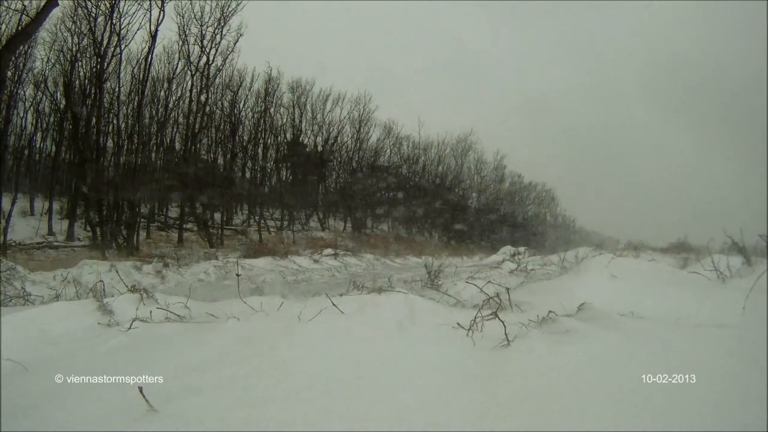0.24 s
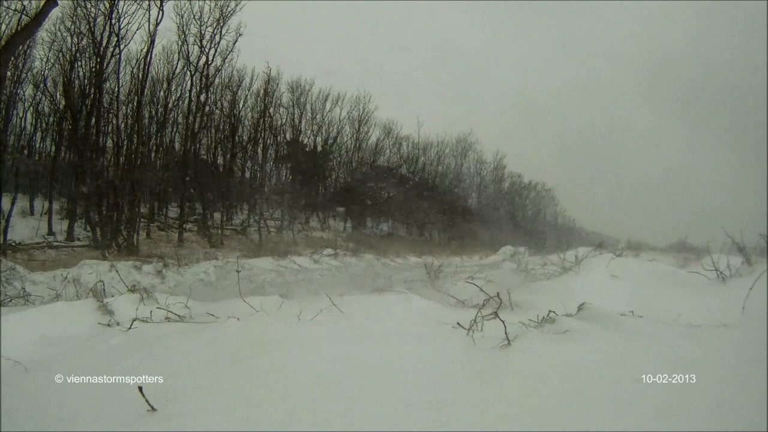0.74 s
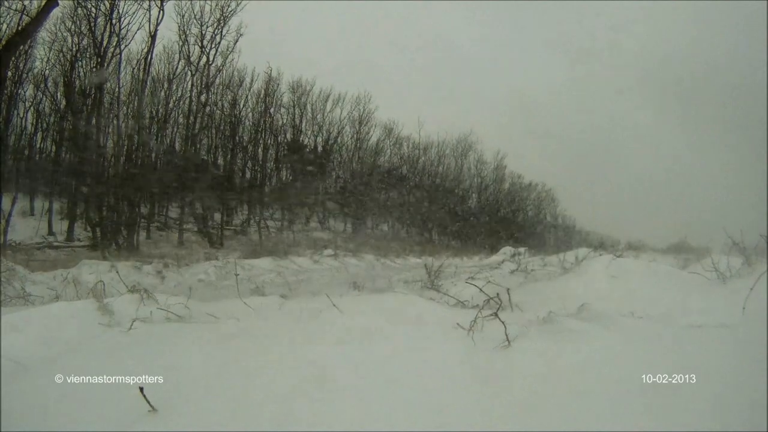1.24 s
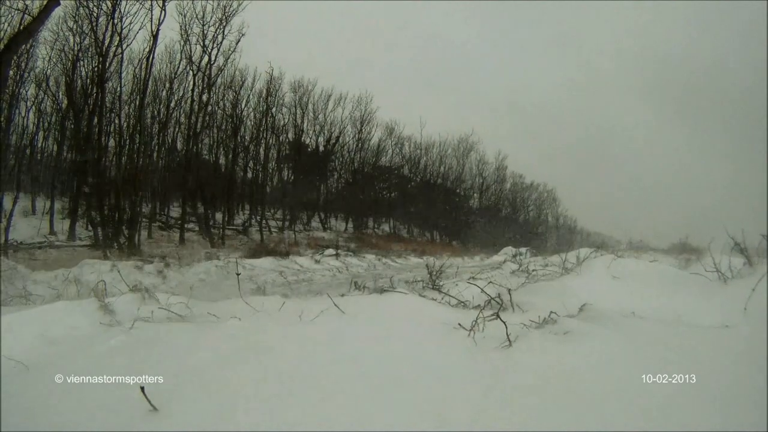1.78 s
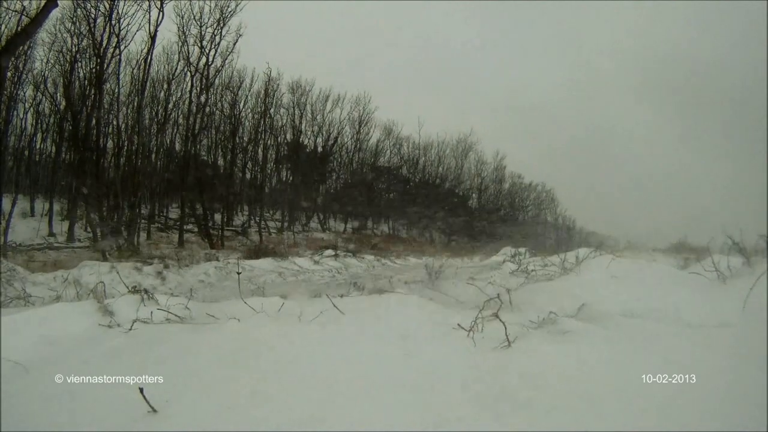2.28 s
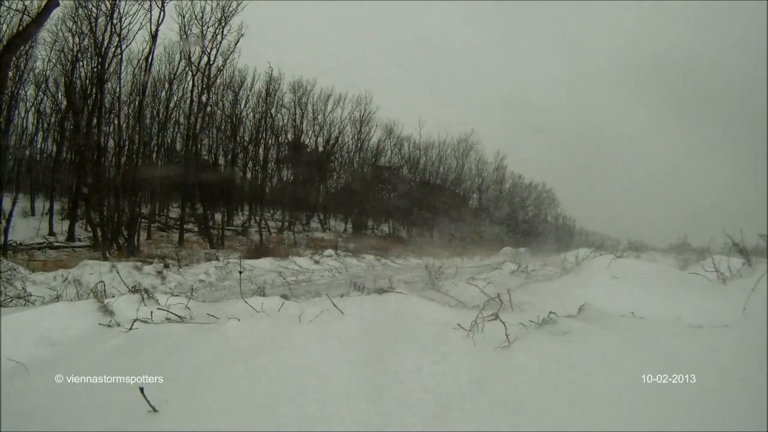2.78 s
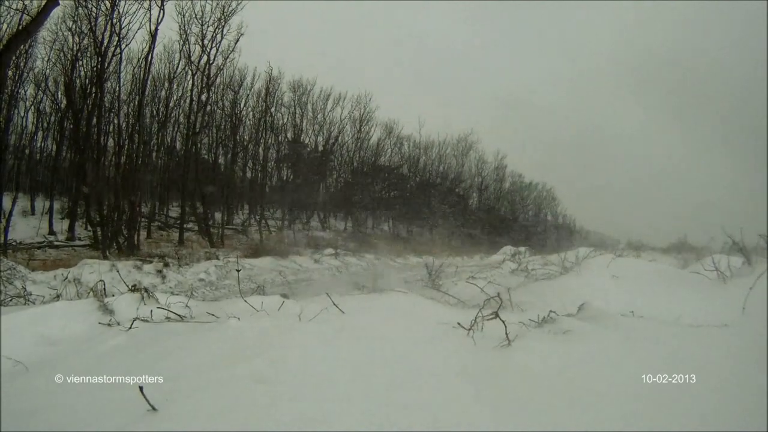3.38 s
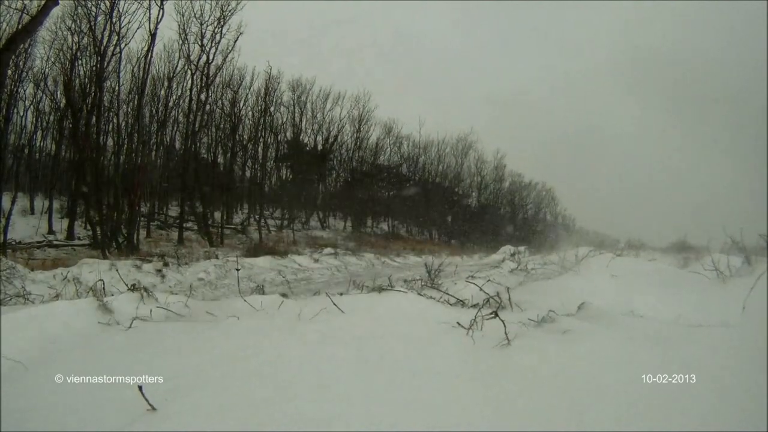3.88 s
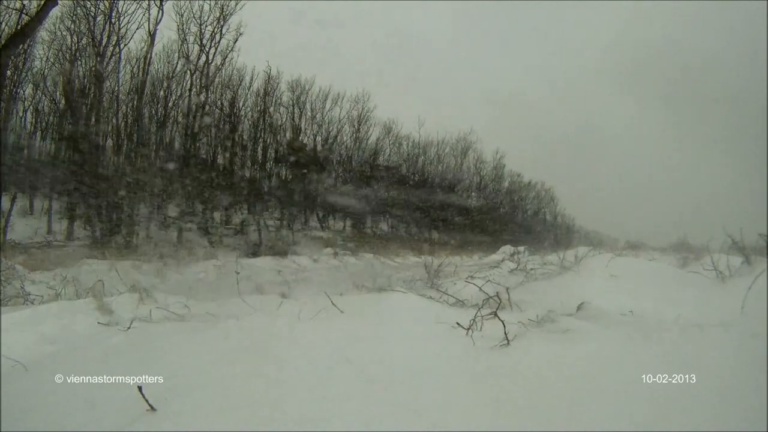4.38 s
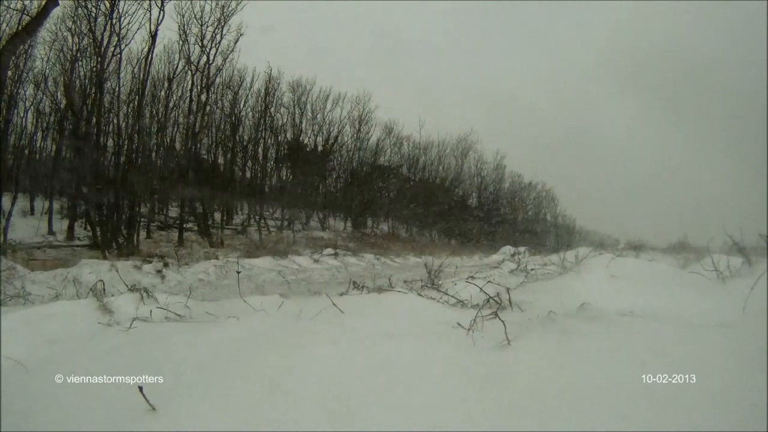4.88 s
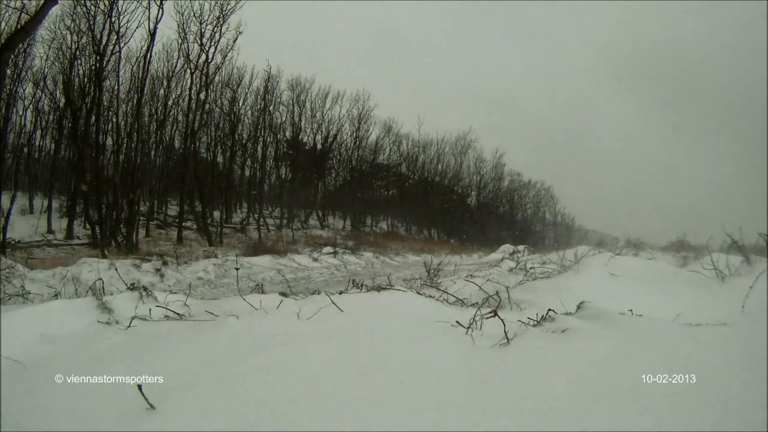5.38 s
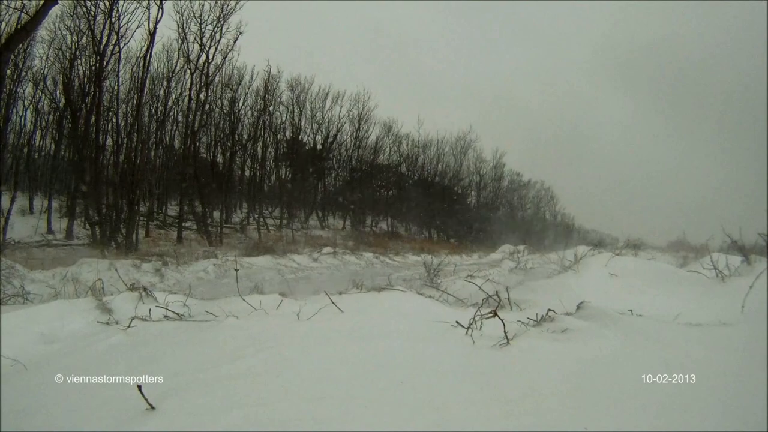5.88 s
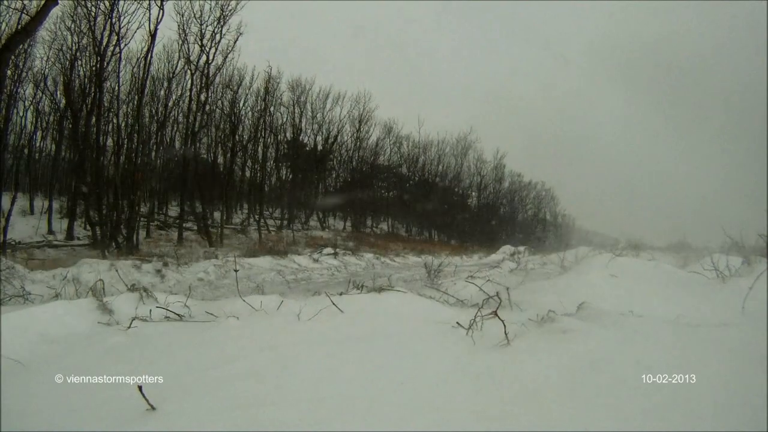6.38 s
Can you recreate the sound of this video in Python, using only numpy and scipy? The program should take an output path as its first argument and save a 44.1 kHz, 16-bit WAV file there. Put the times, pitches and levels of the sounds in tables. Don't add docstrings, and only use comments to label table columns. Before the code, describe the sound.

Blizzard wind strikes a small sealed plastic case over open snowy ground. A low rumble and hollow roar run throughout, while a whistly, fluttering rush surges and drops in quick gusts. Dull knocks come at the start and midway, puffs burst around two seconds, and snow pellets crackle thickest near three and a half. The microphone is inside the case: close, boxy, coarse and gritty, almost no space around it.

```python
import sys
import numpy as np
from scipy import signal
from scipy.fft import rfft, irfft
from scipy.io import wavfile
from scipy.ndimage import uniform_filter1d

SR = 44100
rng = np.random.default_rng(int(sys.argv[2]) if len(sys.argv) > 2 else 0)


def nominal_scale(level):
    x = np.asarray(level, float) / 20
    return 10 ** x


def dump_mix(stems):
    frames = np.atleast_2d(stems).T
    limited = np.clip(frames, -1, 1)
    pcm = np.round(limited * 32767).astype(np.int16)
    wavfile.write(sys.argv[1], SR, pcm)


N = 292824


def evened(x):
    return x / np.sqrt(np.mean(x ** 2) + 1e-20)


def coloured(points):
    f, db = np.transpose(points)
    hz = np.fft.rfftfreq(N, 1 / SR)
    density_db = np.interp(np.log(hz + 1), np.log(f + 1), db)
    return evened(irfft(rfft(rng.standard_normal(N)) * nominal_scale(density_db), N))


def flutter(low_hz, high_hz):
    hz = np.fft.rfftfreq(N, 1 / SR) + 1e-3
    shape = 1 / np.sqrt(hz) / (1 + (low_hz / hz) ** 2) / (1 + (hz / high_hz) ** 2)
    return evened(irfft(rfft(rng.standard_normal(N)) * shape, N))


def ring(x, hz, width_hz):
    r, turn = np.exp(-np.pi * width_hz / SR), np.cos(2 * np.pi * hz / SR)
    return signal.lfilter([1, -r * turn], [1, -2 * r * turn, r * r], x)


def hum(hz, width_hz, db):
    noise = rng.standard_normal(N)
    return nominal_scale(db) * evened(ring(ring(noise, hz, width_hz), hz, width_hz))


def add(mix, s, sound):
    part = mix[max(round(s * SR), 0):][:len(sound)]
    part += sound[:len(part)]


def curves(rows):
    s, *columns = np.transpose(rows)
    return [np.interp(np.arange(N) / SR, s, c) for c in columns]


def swells(rows):
    rise_share = 0.64
    t, out = np.arange(N) / SR, np.zeros((2, N))
    for s, first_db, fall_s, second_db in rows:
        near = slice(max(round((s - .5) * SR), 0), round((s + .5) * SR))
        u = (t[near] - s) / max(fall_s, .01)
        bell = np.exp(-np.where(u < 0, u / rise_share, u) ** 2)
        out[:, near] += np.outer([first_db, second_db], bell)
    return out


# start_s [s], wind_db [dB], rush_sharpness_db [dB], buffeting_db [dB]
STORM_WIND = [(0.0, -29.5, 0.4, -29), (0.31, -28, 2.2, -32.5), (0.72, -28.5, -0.9, -34.5),
              (0.84, -40, -2.8, -33), (1.12, -27.5, 2, -35), (1.6, -30.5, -1.9, -33.5),
              (2.14, -28.5, -1, -31.5), (2.28, -39, 4.2, -32.5), (2.76, -27.5, -2.7, -33.5),
              (3.04, -31.5, 1.6, -35.5), (3.76, -37.9, 0.1, -33), (3.89, -28.5, 1.5, -34.5),
              (4.4, -44, -2.8, -40.5), (4.48, -29.5, 4.5, -35), (5.15, -29.5, 0.5, -32.5),
              (5.45, -44.5, -2.6, -41.5), (6.12, -44, -0.2, -38.5), (6.64, -34.0, -0.8, -34)]
# top_s [s], lift_db [dB], fall_s [s], sharpness_db [dB]
WIND_GUSTS = [(0.143, 2.5, 0.13, -3), (0.254, -7, 0.083, -2), (0.46, -1.5, 0.052, 1),
              (0.628, -3, 0.023, -6), (0.894, 5, 0.022, 4.2), (0.988, 1.6, 0.034, 7), (1.14, 0.1, 0.03, 0),
              (1.234, 0.8, 0.04, -4.5), (1.516, 6.1, 0.066, 0.5), (2.008, -4, 0.022, 4),
              (2.209, 0.7, 0.11, -7), (2.429, 7.4, 0.051, -4.5), (2.595, 11, 0.052, -1.7),
              (2.7, -0.5, 0.025, -1.5), (2.94, 4.5, 0.098, -2.1), (2.999, -7, 0.038, -1),
              (3.12, 1.5, 0.024, 0.5), (3.341, 3, 0.058, -4.5), (3.475, 5, 0.097, 1),
              (3.67, -0.5, 0.09, -1.5), (4.07, 0.5, 0.046, -2.5), (4.15, -2.5, 0.047, 3.5),
              (4.29, 2.5, 0.078, 2), (4.725, -4, 0.16, -2.1), (4.97, 2, 0.054, -1.3), (5.217, -4, 0.02, 4),
              (5.29, 4, 0.022, -1), (5.956, -3.5, 0.19, 1.2), (6.16, 0, 0.045, 3), (6.276, 5, 0.097, -0.5)]
# top_s [s], roar_lift_db [dB], fall_s [s], rumble_lift_db [dB]
CASE_HEAVES = [(0.46, 0.7, 0.07, 2), (0.78, 5.5, 0.1, 0.5), (0.96, -2.5, 0.05, -1), (1.05, 3, 0.074, 3.5),
               (1.4, 1.5, 0.1, 2), (1.72, -3.5, 0.11, -3), (1.93, 3, 0.041, 0), (2.66, 5.5, 0.054, 1.5),
               (2.76, 0.2, 0.037, -1), (3.0, 3.5, 0.065, 3), (3.6, 2, 0.066, -4), (3.78, -1, 0.07, 0.5),
               (4.1, 3.5, 0.077, -3.5), (4.33, 2, 0.04, 2.2), (4.75, 2, 0.083, 1), (4.98, -2, 0.087, 1),
               (5.28, 0, 0.073, 1.5), (5.67, 4, 0.08, 1.5), (5.85, -1, 0.046, 2), (6.0, 1, 0.07, 0.2),
               (6.16, -3.5, 0.05, -1.2), (6.29, 3, 0.097, 2.5), (6.6, -3, 0.07, -2)]


def storm():
    lower_db, upper_db, fizz_db, roar_offset_db = -3, -0.12, -8, -5
    fizz_per_gust, roar_per_gust, roar_per_wind = 1.63, 0.35, 0.16
    calm_db = -30
    wind_db, sharp_db, buffet_db = curves(STORM_WIND)
    gust_db, tilt_db = swells(WIND_GUSTS)
    roar_db, rumble_db = swells(CASE_HEAVES)
    sharp_db = sharp_db + tilt_db
    roar_db = roar_db + roar_offset_db + roar_per_wind * (wind_db - calm_db) + roar_per_gust * gust_db
    return dict(rumble=buffet_db + rumble_db, roar=buffet_db + roar_db,
                lower=wind_db + gust_db - sharp_db + lower_db, upper=wind_db + gust_db + upper_db,
                fizz=wind_db + fizz_per_gust * gust_db + sharp_db + fizz_db)


# start_s [s], peak_db [dB], pitch_hz [Hz], t60_s [s]
MOUNT_KNOCKS = [
    (0.001, -18.5, 253, 0.034),
    (0.209, -26.5, 248, 0.045),
    (0.517, -22, 250, 0.039),
    (0.582, -28, 249, 0.042),
    (2.404, -20, 255, 0.035),
    (3.682, -27.5, 260, 0.042),
]
# start_s [s], peak_db [dB], pitch_hz [Hz], t60_s [s]
HIGH_RAP = (3.667, -27, 850, .02)
# start_s [s], peak_db [dB], pitch_hz [Hz], t60_s [s]
FAR_PINGS = [
    (5.3667, -42, 5380, 0.02),
    (5.5338, -35, 5230, 0.015),
    (5.618, -43, 5250, 0.02),
    (5.7119, -40, 5290, 0.02),
    (5.7912, -44, 5130, 0.02),
    (5.8506, -32, 5190, 0.016),
]


def knocks():
    out, t = np.zeros(N), np.arange(0, .15, 1 / SR)
    for s, db, hz, t60_s in list(MOUNT_KNOCKS) + [HIGH_RAP] + list(FAR_PINGS):
        decay = nominal_scale(db + 10.5 - 60 * t / t60_s)
        onset = 1 - np.exp(-t / (0.12 * t60_s))
        add(out, s, decay * onset * np.sin(2 * np.pi * hz * t))
    return out


# start_s [s], level_db [dB], share of the two lower modes [dB]
SNOW_PELLETS = [(0.3451, 3.5, -4), (1.1513, -11, -15), (2.4117, -6, -7.5), (2.432, -16, -9),
                (2.5905, -4.5, -13), (2.6332, -10, -5), (2.6383, -12.5, -6), (2.71, -2, -4.5),
                (3.0899, -15, -8), (3.2124, -9.5, -6), (3.2404, -9.5, -2.5), (3.355, -14.5, -4),
                (3.4344, -2, -9), (3.4388, -6, -5), (3.4455, -4, -6), (3.4632, -13, 0), (3.4671, -10, -7),
                (3.482, -10, -4), (3.4981, -7, -8), (3.5038, -9, -13), (3.541, -11.5, -5),
                (3.5643, -7, -5.5), (3.7727, -5.5, -4), (4.456, -10, -5.5), (5.0425, -14, -7),
                (5.045, -13.5, -12), (6.2894, -13.5, -10), (6.296, -16, -5), (6.3234, -8.5, -9),
                (6.3298, -12, -1.5)]
# start_s [s], level_db [dB]
LONE_FLAKES = [(0.0217, -26), (0.2966, -28), (0.9802, -20), (1.0042, -27), (1.1333, -20), (1.4161, -16),
               (2.4072, -18), (2.4166, -21), (2.4681, -16), (2.5794, -18), (2.612, -17), (2.7418, -16.5),
               (3.053, -21), (3.161, -21), (3.247, -19), (3.2737, -19), (3.2765, -16), (3.3438, -20),
               (3.3747, -25), (3.582, -21), (4.562, -17), (4.58, -18), (5.0479, -17), (5.0712, -17.5),
               (5.1482, -18.5), (5.2367, -23), (6.0343, -42), (6.285, -16), (6.3897, -28), (6.4299, -24.5)]
# start_s [s], length_s [s], level_db [dB]
SNOW_FLURRIES = [
    (1.1, .06, -26),
    (2.4, .05, -25.5),
    (3.026, .09, -28.5),
    (3.33, .04, -20.5),
    (3.534, .013, -19),
    (4.56, .03, -26),
    (5.04, .02, -23),
    (5.36, .2, -48.5),
    (5.7, .12, -47),
    (6.025, .2, -52),
]
# pitch_hz [Hz], width_hz [Hz], level_db [dB]
TICK_MODES = [(2170, 260, -5), (3650, 430, 4.5), (5144, 353, 4)]


def snow(fizz_db):
    flake_share_db = -4
    fine_per_s, fine_db, fine_spread_db = 70, 2, 2.5
    flurry_per_s = 70
    choke_s = 0.0012
    flakes = [(*row, flake_share_db) for row in LONE_FLAKES]
    s, db, share_db = np.transpose(list(SNOW_PELLETS) + flakes)
    spread_db = fine_spread_db * np.minimum(rng.exponential(1, N), 3)
    luck = rng.random((2, N))
    fine = nominal_scale(fizz_db + fine_db + spread_db) * (luck[0] < fine_per_s / SR)
    for start_s, length_s, flurry_db in SNOW_FLURRIES:
        span = slice(round(start_s * SR), round((start_s + length_s) * SR))
        fine[span] += nominal_scale(flurry_db + spread_db[span]) * (luck[1, span] < flurry_per_s / SR)
    t, out = np.arange(100) / SR, 0
    choke = 1 / (1 + np.exp((t - choke_s) / .00008))
    strike = np.round((s - .0004) * SR).astype(int)
    for (hz, width_hz, mode_db), mode_share_db, sign in zip(TICK_MODES, (share_db, share_db, 0 * db), (1, -1, 1)):
        clicks = fine.copy()
        clicks[strike] += nominal_scale(0.99 * db + mode_share_db)
        tick = nominal_scale(mode_db) * np.exp(-np.pi * width_hz * t) * np.cos(2 * np.pi * hz * t) * choke
        out = out + sign * signal.oaconvolve(clicks, tick)[:N]
    return out


# pitch_hz [Hz], density_db [dB per Hz]
RUMBLE_SPECTRUM = [(11, -35), (18, -4), (38, 2), (54, 2), (102, -7), (140, -4.5), (153, -10), (184, -19),
                   (210, -19.5), (259, -14), (340, -20), (440, -51), (750, -120)]
# pitch_hz [Hz], density_db [dB per Hz]
ROAR_SPECTRUM = [(190, -37), (330, -17.5), (361, -9.5), (398, -2), (456, 0.5), (745, -8), (895, -4.5),
                 (1040, -10), (1150, -5.5), (1500, -18), (2530, -120)]
# pitch_hz [Hz], width_hz [Hz], level_db against the rumble [dB]
MOUNT_MODES = [
    (50, 38, -8.5),
    (139, 15.6, -11),
]
# pitch_hz [Hz], width_hz [Hz], level_db against the roar [dB]
CASE_AIR = (459, 66, -12.5)


def shake(rumble_db, roar_db):
    rumble = coloured(RUMBLE_SPECTRUM) + sum(hum(*mode) for mode in MOUNT_MODES)
    rumble /= (uniform_filter1d(rumble ** 2, size=2600) + .1) ** 0.16
    roar = coloured(ROAR_SPECTRUM) + hum(*CASE_AIR)
    roar = roar * nominal_scale(1.2 * flutter(low_hz=6.2, high_hz=40))
    return nominal_scale(rumble_db + 0.4) * evened(rumble) + nominal_scale(roar_db + 0.8) * evened(roar)


# start_s [s], peak_db [dB], pitch_hz [Hz], length_s [s]
AIR_PUFFS = [(0.1695, -15, 2150, 0.013), (0.181, -15, 1450, 0.013), (0.737, -30, 2080, 0.012),
             (0.9016, -7.5, 1520, 0.0077), (1.407, -19, 1930, 0.011), (1.518, -12, 1480, 0.014),
             (1.586, -14, 1480, 0.014), (1.9784, -9, 1570, 0.011), (2.0443, -14, 1520, 0.015),
             (2.0767, -2.5, 1490, 0.012), (2.1206, -12, 1710, 0.012), (2.1444, -10, 1500, 0.012),
             (2.1909, -11, 1490, 0.011), (2.237, -19, 1490, 0.015), (2.2455, -14.5, 1320, 0.025),
             (2.4104, -14, 2080, 0.012), (2.607, -2.5, 2090, 0.01), (2.6284, -6.5, 1424, 0.028),
             (2.6756, -8, 1460, 0.011), (2.7506, -5.5, 1470, 0.009), (3.31, -19, 2030, 0.012),
             (3.671, -17.5, 1930, 0.013), (4.504, -14.5, 2160, 0.01), (5.1277, -13, 1470, 0.01),
             (5.297, -20, 1480, 0.012), (5.53, -21.5, 2170, 0.011), (5.908, -24.5, 1490, 0.012),
             (6.031, -21.5, 1970, 0.015), (6.19, -23, 2210, 0.0092), (6.525, -14.5, 2010, 0.011)]


def puffs():
    out = np.zeros(N)
    for (s, db, hz, length_s), (phase, drift) in zip(AIR_PUFFS, rng.random((len(AIR_PUFFS), 2))):
        t = np.arange(0, max(length_s, .004), 1 / SR)
        u = t / t[-1]
        cycles = phase + hz * t * (1 + 0.048 * (drift - .5) * u)
        swell = np.sin(np.pi * u ** 0.34) ** 2
        add(out, s - .0008, nominal_scale(db - 7.5) * np.sin(2 * np.pi * cycles) * swell)
    return out


# pitch_hz [Hz], width_hz [Hz], level_db [dB]
LOWER_MODES = [(1302, 290, -8), (1457, 142, 1), (1605, 150, -5.5)]
# pitch_hz [Hz], width_hz [Hz], level_db [dB]
UPPER_MODES = [(1910, 270, -2), (2099, 184, -0.5), (2323, 306, -7)]
# pitch_hz [Hz], width_hz [Hz], level_db [dB]
FIZZ_MODES = [(2770, 590, -10.5), (3502, 360, -3.5), (4370, 630, -7), (5104, 390, -6.5)]


def rush(*levels_db):
    shared, out = flutter(low_hz=6.1, high_hz=96), 0
    for level_db, modes, shared_db in zip(levels_db, (LOWER_MODES, UPPER_MODES, FIZZ_MODES), (1.8, 1.7, 2.4)):
        layer = 0
        for hz, width_hz, db in modes:
            own = flutter(low_hz=2.3, high_hz=60)
            eddies = rng.standard_normal(N) * nominal_scale(shared_db * shared + 1.07 * own)
            rung = ring(ring(eddies, hz, 1.64 * width_hz), hz, 1.77 * width_hz)
            layer = layer + nominal_scale(db) * evened(rung)
        out = out + nominal_scale(level_db + 1.21) * evened(layer)
    return out


def scene():
    level = storm()
    air = shake(level["rumble"], level["roar"]) + rush(level["lower"], level["upper"], level["fizz"])
    return np.tile(air + puffs() + snow(level["fizz"]) + knocks(), (2, 1))


def sample_and_hold(x):
    edge_hz, ceiling = 6440, 1.1
    smooth = signal.oaconvolve(x, signal.firwin(75, edge_hz, window=("kaiser", 4), fs=SR), "same")
    slow = signal.resample_poly(smooth, 40, 147, window=("kaiser", 2))
    full = np.clip(slow, -ceiling, ceiling)
    return signal.resample_poly(np.repeat(full, 4), 147, 160)[:N]


# start_s [s], level_db [dB]
CHANNEL_SLIPS = [
    (2.483, -14),
    (2.61, -18),
    (3.115, -16),
    (3.5393, -14),
    (4.5628, -15),
    (5.0564, -24),
]


def slips(both):
    for s, db in CHANNEL_SLIPS:
        add(both[0], s, -nominal_scale(db) * np.ones(8))


def band(x, low_hz, high_hz):
    taps = signal.firwin(401, [low_hz, high_hz], window=("kaiser", 8), pass_zero=False, fs=SR)
    return signal.oaconvolve(x, taps[None], "same")


def thin_treble(both, level):
    top_hz, gap_db = 15300, -38
    kept = both - band(both, top_hz, .49 * SR)
    edge = band(both, top_hz, 1.035 * top_hz)
    power = uniform_filter1d(edge[0] ** 2, size=700)
    peaks = power > 4.5 * uniform_filter1d(power, size=9000)
    sudden = uniform_filter1d(1. * peaks, size=500)
    gap = band(both, 11650, 12600)
    masked = uniform_filter1d(gap[0] ** 2, size=1024) < (nominal_scale(gap_db) * level) ** 2
    return kept + sudden * edge - uniform_filter1d(1. * masked, size=500) * gap


def band_limit(x):
    return signal.sosfilt(signal.butter(12, 16520, fs=SR, output="sos"), x)


def record(dry):
    grain_db, hiss_db = -27.5, -68.5
    held = sample_and_hold(dry[0])
    level = np.sqrt(uniform_filter1d(held ** 2, size=1024) + 1e-12)
    grainy = held + nominal_scale(grain_db) * level * rng.standard_normal(N)
    both = grainy + nominal_scale(hiss_db) * rng.standard_normal((2, N))
    slips(both)
    mix = thin_treble(both, level)
    return band_limit(mix)


dry = scene()
out = record(dry)
dump_mix(out)
```